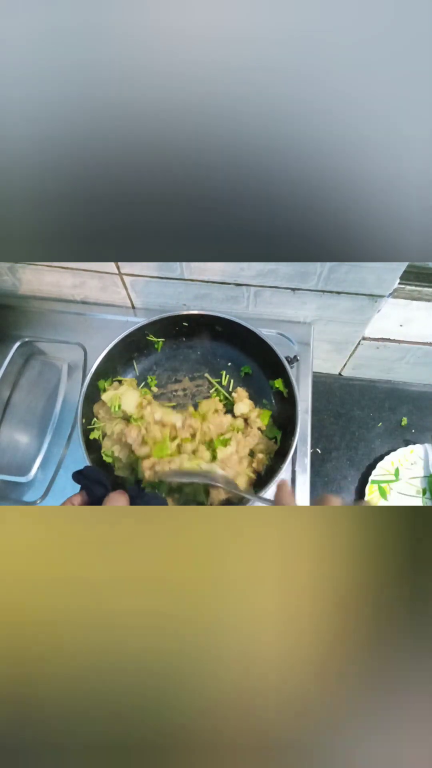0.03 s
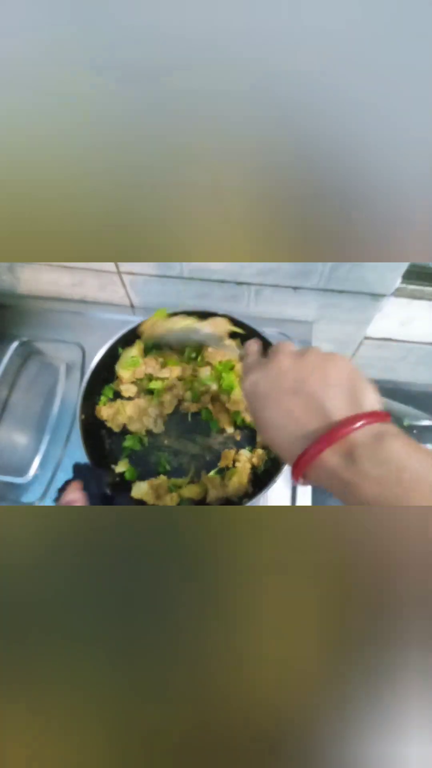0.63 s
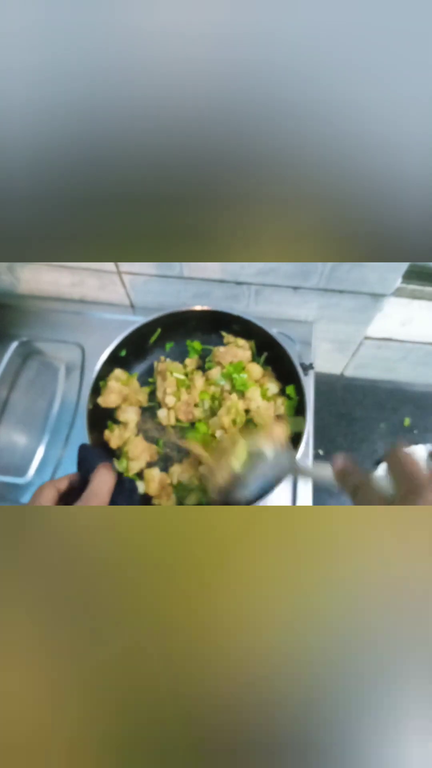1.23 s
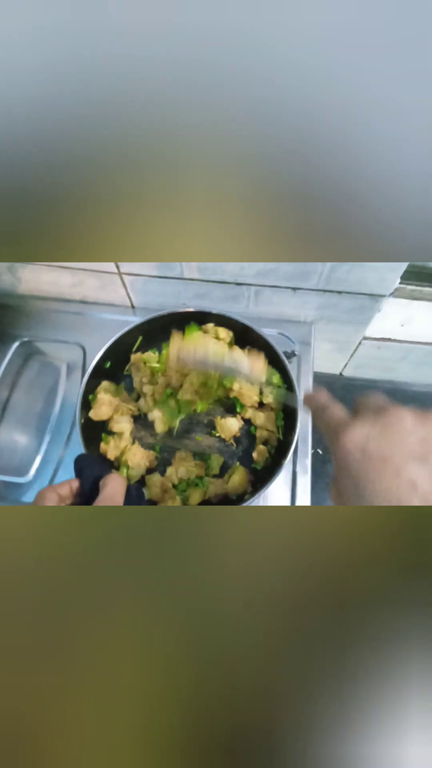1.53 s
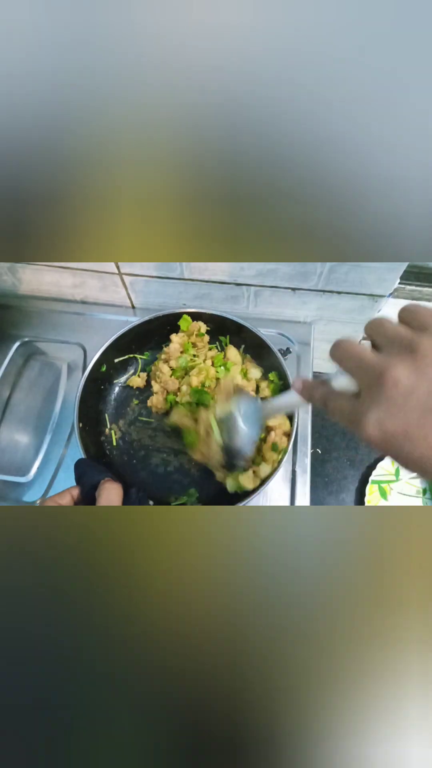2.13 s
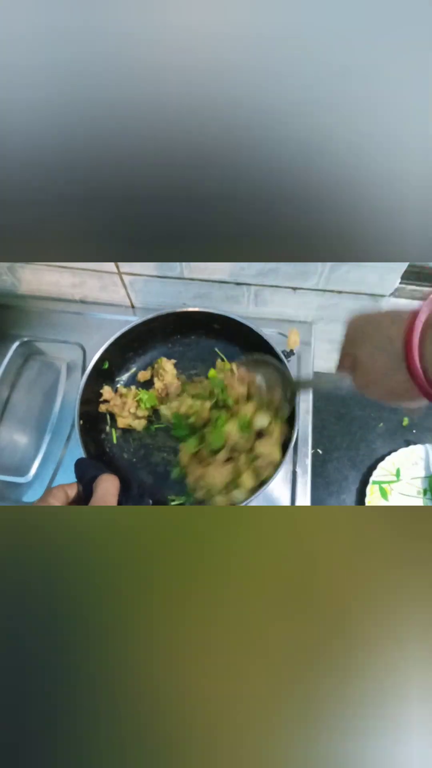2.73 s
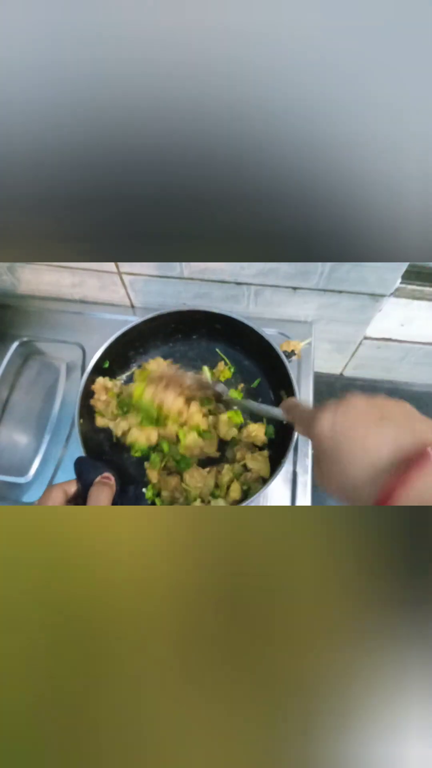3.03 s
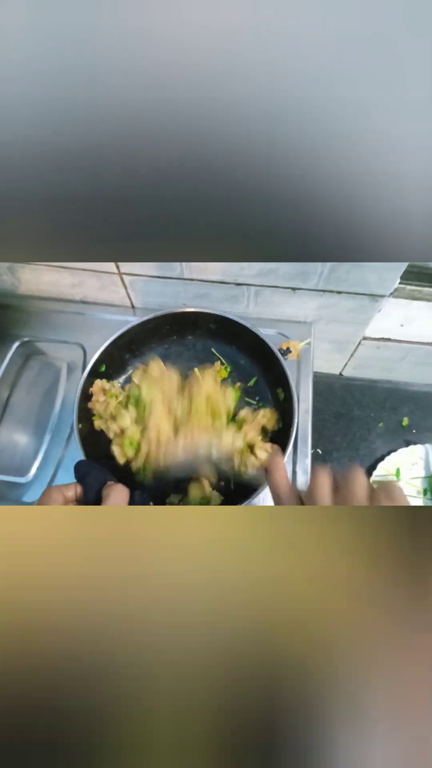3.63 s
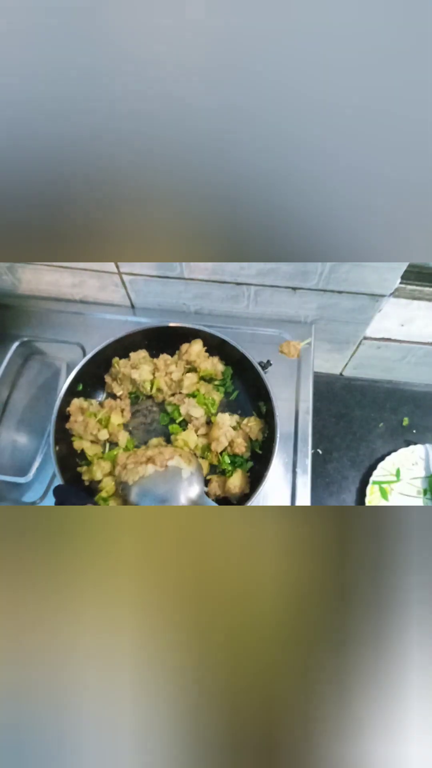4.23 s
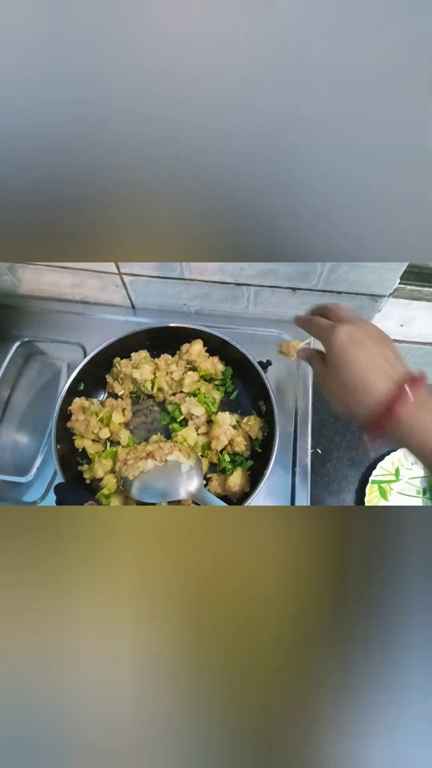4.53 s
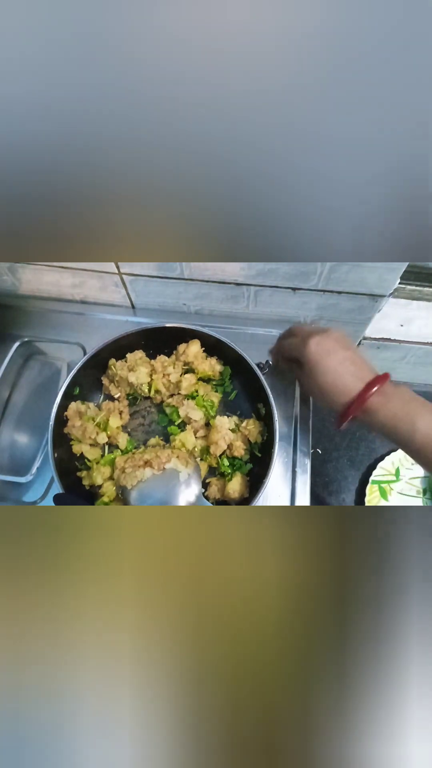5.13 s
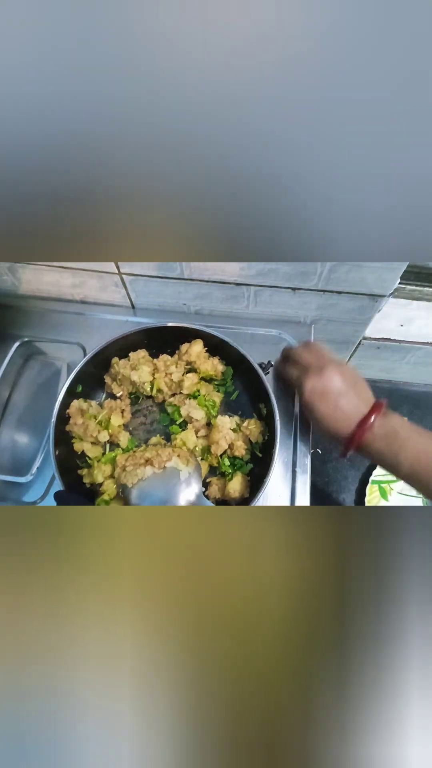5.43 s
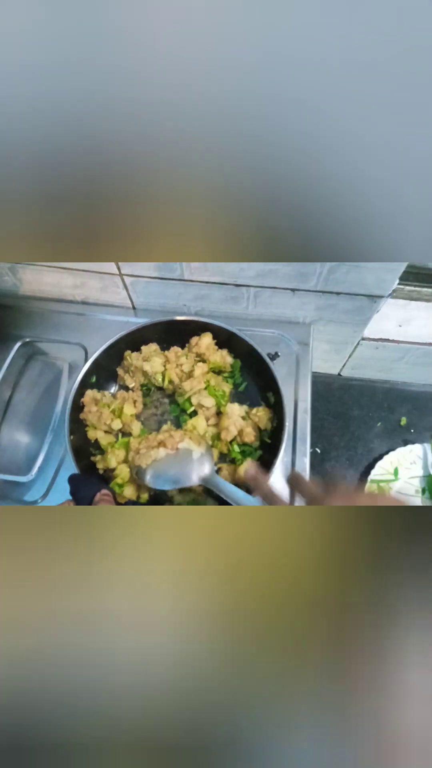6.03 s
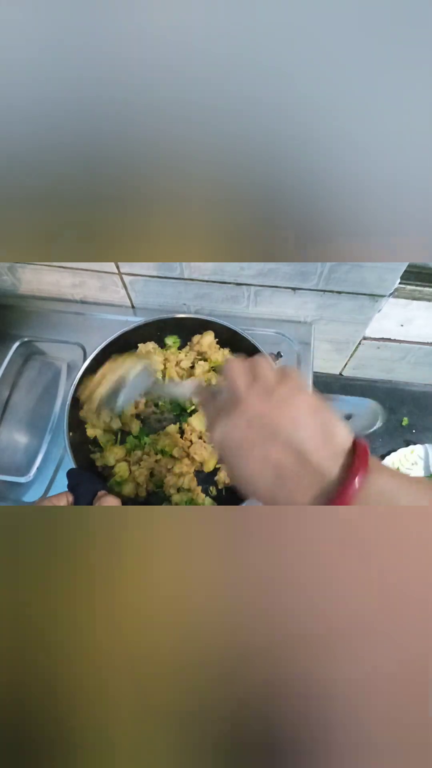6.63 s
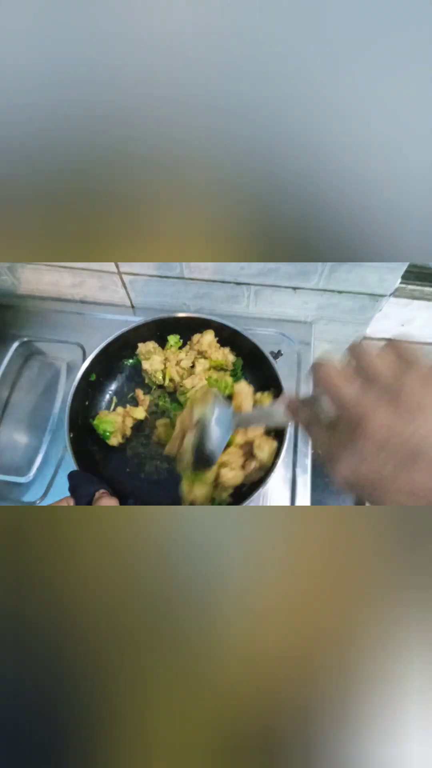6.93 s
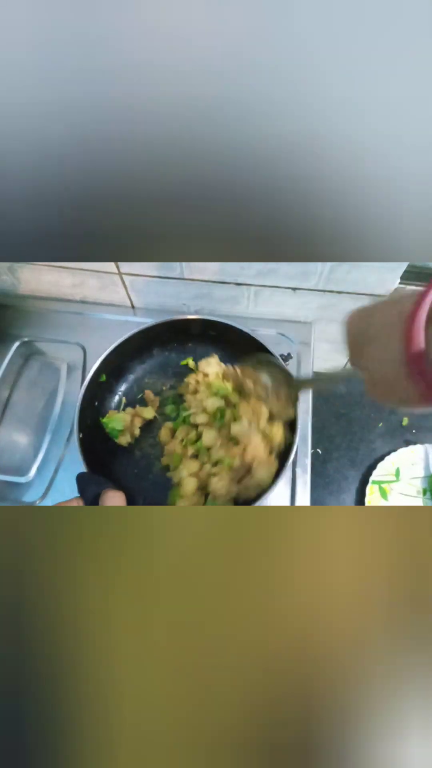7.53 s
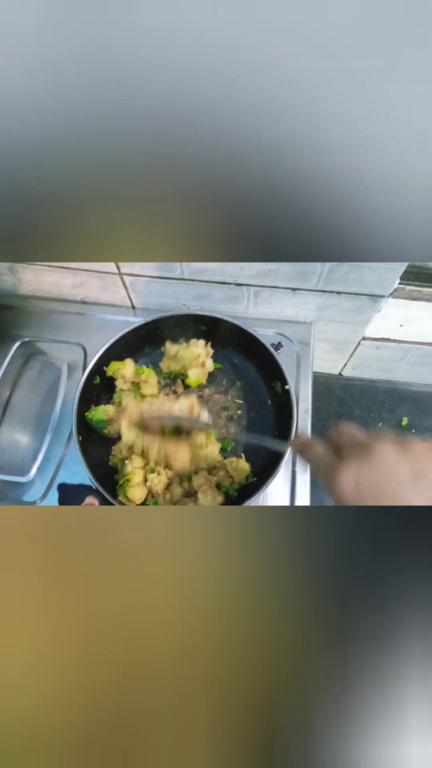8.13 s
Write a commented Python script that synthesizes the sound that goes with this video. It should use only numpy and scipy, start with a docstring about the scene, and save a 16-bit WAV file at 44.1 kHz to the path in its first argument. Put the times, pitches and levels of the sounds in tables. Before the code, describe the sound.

Thick, moist food shuffles around a frying pan as a metal spoon knocks and rasps against it in a small kitchen.

```python
"""Stirring in a frying pan

A metal spoon stirs a thick filling in a non-stick pan on a steel stove top, in a small tiled kitchen.
Blows ring the pan's modes; tiny slips drag through the food and rasp on the coating; stick-slip of
the edge squeals. Midway the spoon is laid down and the pan clatters on its support; stirring resumes."""
import sys
import numpy as np
from scipy import signal
from scipy.fft import rfft, irfft
from scipy.io import wavfile

SR = 44100
rng = np.random.default_rng(int(sys.argv[2]) if len(sys.argv) > 2 else 0)


def digitize_waveform(pressure):
    """Quantize a signal to 16-bit integers and store it at the path in sys.argv[1].

    Rows of a 2-D input are taken as channels; values are limited to [-1, 1].
    """
    field = np.atleast_2d(pressure).T
    bounded = np.clip(field, -1, 1)
    quanta = np.round(bounded * 32767).astype(np.int16)
    wavfile.write(sys.argv[1], SR, quanta)


N = 366030

# room rumble and hiss: f/Hz, density/dB
BACKGROUND_SPECTRUM = [(25, -42.5), (60, -14.5), (114, -3.5), (161, -21.5), (250, -7), (335, -17.5),
                       (530, -16), (1230, -26), (2480, -27), (4000, -27.5), (5600, -20), (7100, -16),
                       (9000, -32), (13500, -40.5), (15200, -30)]
# kitchen decay: f/Hz, T60/s
KITCHEN_T60 = [(150, 0.57), (400, 0.29), (1000, 0.3736), (2800, 0.56), (7000, 0.0856), (14000, 0.15)]
# reverberation re direct sound: f/Hz, level/dB
KITCHEN_WET = [(200, -1.5), (900, -1.5), (3000, -4.5), (7000, 1), (14000, 3)]
# pan shifting on the stove top: t/s, length/s, level/dB
PAN_SHIFTS = [(3.05, 0.78, -71), (7.1, 0.71, -70.5)]
# clear pan modes: f/Hz, energy/dB, T60/s
PAN_MODES = [(261, -3.5, 0.27), (384, -7, 0.23), (462, -8, 0.14), (587, -10, 0.43), (636.3, -5.5, 0.6),
             (707, -16, 0.22), (836, -2, 0.27), (902.3, -2, 0.16), (934, -1.5, 0.42), (1113, -9.5, 0.39),
             (1954, -12, 0.12), (2880, -13, 0.092), (4780, -9.5, 0.14), (6380, -10, .2), (7000, -7.5, 0.19),
             (6680, -13, 0.27), (7100, -17, 0.4)]
# dense, food-damped pan modes: f/Hz, density/dB
PAN_SPECTRUM = [(110, -10.5), (170, -11.5), (245, 10.5), (330, -8), (450, -3.5), (740, -2), (890, 7.5),
                (1100, -5), (1500, 0.5), (2200, -3.5), (2800, -4), (3800, -9.5), (4900, -7), (7000, 0.5),
                (8400, -13.5), (13000, -35), (15200, -22.5)]
# broad resonances of the held spoon: f/Hz, density/dB
SPOON_SPECTRUM = [(1000, -42), (2600, -11), (3500, -18), (4100, -6.5), (4950, -4), (5300, -5), (5650, -8.5),
                  (6500, -8.5), (7600, -5.5), (8500, -27), (15000, -35)]
# touches that ring only the spoon: t/s, relative level/dB
SPOON_CLINKS = [(0.3, -60.5), (1.3093, -43), (3.627, -50.5), (7.990, -50.5)]
# stick-slip of the edge: t/s, length/s, level/dB, slip rate/Hz
EDGE_SQUEALS = [(2.201, 0.0081, -49, 2560), (2.244, 0.014, -35.5, 2904), (2.254, 0.0177, -36.5, 2983),
                (2.326, 0.023, -37.5, 943), (2.369, 0.0145, -43.5, 948), (3.279, 0.0205, -35.5, 920),
                (3.295, 0.025, -41.5, 1255), (4.753, 0.014, -47.5, 576), (6.42, 0.0308, -39, 865),
                (6.898, 0.048, -46, 2080), (7.036, 0.04, -41, 2830), (7.064, 0.015, -37.5, 901),
                (7.109, 0.01, -37, 940)]
# weights of the squeal partials: f/Hz, relative level/dB
SQUEAL_SPECTRUM = [(950, 48), (1800, -25), (3000, 1.5), (6000, 1.5), (9000, -12), (12000, -16),
                   (16000, -20)]
# drag, judder and grit bands: low/Hz, high/Hz
FRICTION_BANDS = [(150, 700), (700, 3500), (3500, 17000)]
# bare edge on the coating: t/s, rise/s, fall/s, relative level/dB, grit re judder/dB, resonance/Hz
EDGE_SCRAPES = [(1.465, .03, 0.055, -51.5, 6.5, 3340), (2.246, 0.017, 0.04, -40.5, 9.5, 6300),
                (2.30, 0.025, 0.097, -45, 0.5, 1460), (3.245, 0.037, 0.057, -35, -12, 1430),
                (3.702, 0.0069, 0.17, -45, -7.5, 2000), (6.42, 0.022, 0.027, -45.5, 0.5, 5600),
                (6.601, 0.0073, 0.066, -44, -11.5, 2050), (6.893, 0.032, 0.059, -45.5, 4.5, 890),
                (7.036, 0.015, 0.062, -39, 4.5, 5300)]
# spoon pushing the filling: t/s, rise/s, fall/s, relative level/dB, bareness of the coating/dB
FOOD_PUSHES = [(0.275, 0.019, 0.091, -58.5, -15), (0.48, 0.14, 0.31, -53, 3), (0.818, .05, 0.11, -61.5, 3),
               (0.94, 0.023, 0.099, -37.5, -0.5), (1.06, 0.077, 0.13, -51.5, 7),
               (1.445, .012, 0.082, -36.5, 4.5), (1.62, 0.053, 0.067, -63, 14.5),
               (2.22, .16, 0.17, -51, -1), (3.14, 0.031, 0.07, -47, 12), (3.25, 0.077, 0.083, -39, 3),
               (3.699, 0.083, 0.17, -40, 2), (4.67, 0.077, 0.064, -46.5, -16),
               (4.79, 0.062, 0.068, -59, -13), (5.03, 0.17, 0.018, -51, 4), (5.205, 0.015, .13, -36, 2.5),
               (6.10, 0.044, 0.16, -67, 9), (6.237, 0.03, 0.096, -43, 8.5), (6.36, 0.042, 0.068, -40.5, 2),
               (6.471, 0.11, 0.073, -60.5, 11.5), (6.889, 0.078, 0.21, -44, 8),
               (7.06, 0.068, 0.16, -40.5, 3.5), (7.40, 0.047, 0.13, -47.5, -1), (8.15, 0.083, 0.05, -49, 5)]
# thud, clang, clack and tick bands: low/Hz, high/Hz
BLOW_BANDS = [(130, 660), (660, 1150), (1150, 4000), (4000, 17000)]
# blows of spoon, pan and support: # t/s, force/dB, hardness/dB (<0 through food, >0 bare metal), relative
# clang/dB, swing pitch/Hz (mostly the pan base; the 260 Hz row is the spoon juddering)
BLOWS = [(0.002, -47.5, -0.5, -2, 936), (0.272, -66, -1, 3, 933), (0.475, -49, 0, 5.5, 889),
         (0.932, -42, -4, 10, 740), (1.023, -48.5, -1.5, -0.5, 960), (1.108, -50, -2, 5, 876),
         (1.383, -58, -0.5, 6.5, 866), (1.4427, -45, -4, 4.5, 872), (1.863, -57, 0.5, -3, 922),
         (2.031, -50.5, -0.5, 7, 882), (2.0925, -30.5, 3, 9.5, 843), (2.2119, -47, 4, 5, 2660),
         (2.417, -51, 1, -12, 990), (2.5135, -56.5, -1.5, 5.5, 1046), (3.1369, -41.5, 0, 2, 1595),
         (3.16, -47.5, -5, 12.5, 260), (3.234, -41.5, -4, 8, 921), (3.311, -40.5, 3, -2.5, 727),
         (3.4317, -49.5, 1, 5, 838), (3.6753, -56.5, -2.5, 4, 843), (3.7021, -48, -1.5, -1, 666),
         (4.1592, -55, -3.5, -4, 1038), (4.2504, -67.5, -4.5, 7, 797), (4.659, -58.5, -8, 4, 884),
         (4.7298, -62.5, 3, -14, 880), (5.1992, -36.5, -0.5, -4, 1053), (5.2466, -53.5, 11.5, 9, 660),
         (5.7504, -70, -4, 3, 876), (6.2365, -52, -7.5, 3, 900), (6.342, -50.5, -1, 1.5, 923),
         (6.6, -48.5, -5.5, -1.5, 904), (6.894, -50, 5.5, -9, 840), (6.982, -48, 3, 6, 873),
         (7.2558, -54.5, -3, -6, 980), (7.536, -53, -4, 3.5, 901), (8.141, -58.5, -3.5, 2, 737),
         (8.2013, -57.5, -5, 11, 927)]


def gain_of(db):
    """dB to amplitude."""
    return 10 ** (np.asarray(db) / 20)


def unit_rms(x):
    """Scale to rms 1."""
    return x / np.sqrt(np.mean(x ** 2) + 1e-20)


def curve_at(points, hz):
    """Interpolate over log frequency."""
    f, value = np.transpose(points)
    return np.interp(np.log(hz + 1), np.log(f), value)


def add(mix, start_s, sound):
    """Mix a sound in at start_s."""
    part = mix[max(0, round(start_s * SR)):][:len(sound)]
    part += sound[:len(part)]


def bandpass(x, edges_hz, order=3):
    """Causal Butterworth band-pass."""
    return signal.sosfilt(signal.butter(order, edges_hz, "band", fs=SR, output="sos"), x)


def noise(spectrum, size):
    """Shaped noise, rms 1."""
    shape = gain_of(curve_at(spectrum, np.fft.rfftfreq(size, 1 / SR)))
    return unit_rms(irfft(rfft(rng.standard_normal(size)) * shape, size))


def wander(cutoff_hz, size):
    """Smooth random signal, rms 1."""
    rolloff = 1 + (np.fft.rfftfreq(size, 1 / SR) / cutoff_hz) ** 4
    return unit_rms(irfft(rfft(rng.standard_normal(size)) / rolloff, size))


def background(level_db=-70.5, waver_db=2.7, waver_hz=6):
    """Low room rumble and faint hiss, wavering slightly."""
    return gain_of(level_db - waver_db * wander(waver_hz, N)) * noise(BACKGROUND_SPECTRUM, N)


def kitchen(x, first_echo_s=0.0066, build_up_s=0.0021):
    """Close tiled walls add dense, early echoes; each band decays at its own rate."""
    t = np.arange(SR) / SR
    echoes = rng.choice([-1., 1.], SR) * (rng.random(SR) < .1)
    echoes = unit_rms(echoes) * (1 - np.exp(-np.maximum(t - first_echo_s, 0) / build_up_s))
    hz, frame_s, spectra = signal.stft(echoes, SR, nperseg=256)
    decay_per_s = np.log(1000) / curve_at(KITCHEN_T60, hz)[:, None]
    decay = np.exp(-decay_per_s * frame_s) * np.sqrt(2 * decay_per_s / SR)  # unit energy
    wet = gain_of(curve_at(KITCHEN_WET, hz))[:, None]
    tail = signal.istft(spectra * decay * wet, SR, nperseg=256)[1]
    return x + signal.fftconvolve(x, tail)[:N]


def stove(thump_db=-35, thump_s=0.046, band_hz=(50, 110), size=32768):
    """The stove top rumbles as the pan shifts and thumps faintly under each blow."""
    envelope, t = np.zeros(N), np.arange(size) / SR
    for start_s, length_s, db in PAN_SHIFTS:
        add(envelope, start_s, gain_of(db) * np.sin(np.linspace(0, np.pi, round(length_s * SR))))
    for start_s, force_db, *_ in BLOWS:
        add(envelope, start_s, gain_of(force_db + thump_db) * np.exp(-t / thump_s))
    return envelope * unit_rms(bandpass(rng.standard_normal(N), band_hz, order=2))


def clinks(trim_db=1, damping_s=0.0053, ping_hz=5280, ping_db=-5, ping_decay_s=0.0076, size=8192):
    """The spoon pings; the hand damps it almost at once."""
    out, t = np.zeros(N), np.arange(size) / SR
    ping = gain_of(ping_db) * np.sin(2 * np.pi * ping_hz * t) * np.exp(-t / ping_decay_s)
    for start_s, db in SPOON_CLINKS:
        burst = noise(SPOON_SPECTRUM, size) * np.exp(-t / damping_s)
        add(out, start_s, gain_of(db + trim_db) * (burst + ping))
    return out


def squeals(sag=0.034, jitter=0.057, jitter_hz=600, flutter_db=3, flutter_hz=160, size=8192):
    """Near-periodic stick-slip of the spoon's edge: five hoarse partials, sagging in pitch."""
    out = np.zeros(N)
    for start_s, length_s, db, slip_hz in EDGE_SQUEALS:
        n = round(length_s * SR)
        hz = slip_hz * (1 + sag * np.linspace(.5, -.5, n) + jitter * wander(jitter_hz, size)[:n])
        phase = 2 * np.pi * np.cumsum(hz) / SR
        tone = sum(gain_of(curve_at(SQUEAL_SPECTRUM, k * slip_hz)) * np.sin(k * phase)
                   for k in range(1, 6))
        grip = gain_of(flutter_db * wander(flutter_hz, size)[:n]) * signal.windows.tukey(n, .3)
        add(out, start_s, gain_of(db) * unit_rms(tone * grip))
    return out


def pan(contact_s, ring_db, attack_s=0.00074, size=32768):
    """Response to one touch: a burst of dense modes, plus clear ones weighted at random by place."""
    t = np.arange(size) / SR
    burst = noise(PAN_SPECTRUM, size) * np.exp(-t / contact_s)
    ring = np.zeros(size)
    for (hz, db, t60_s), (place, phase_turns) in zip(PAN_MODES, rng.random((len(PAN_MODES), 2))):
        mode = np.sin(2 * np.pi * (hz * t + phase_turns)) * gain_of(-60 * t / t60_s)
        ring += gain_of(db) * (.5 + .5 * place) * unit_rms(mode)
    food_cushion = 1 - np.exp(-(t / attack_s) ** 2)
    return (unit_rms(burst) + gain_of(ring_db) * ring) * food_cushion


def stroke(rise_s, fall_s, bands_db, ring_db, slips_per_s, slip_db, clump_db, clump_hz, contact_s,
           catches_per_s=45, arch_db=20, size=32768):
    """Clumps of tiny, uneven slips excite the pan under one arch of hand pressure."""
    t = np.arange(0, rise_s + fall_s, 1 / SR)
    slips = (rng.random(size) < slips_per_s / SR) * rng.choice([-1, 1], size)
    spread_db = slip_db * np.minimum(rng.exponential(1, size), 3)
    slips = slips * gain_of(spread_db + clump_db * wander(clump_hz, size))
    # the edge catches on four places in turn, each with its own colour
    place = np.cumsum(rng.random(size) < catches_per_s / SR) % 4
    rub = sum(irfft(rfft(slips * (place == k)) * rfft(pan(contact_s, ring_db), size)) for k in range(4))
    slack = np.interp(t, [0, rise_s, rise_s + fall_s], [1, 0, 1]) ** 1.25
    pressure = gain_of(-arch_db * slack) * signal.windows.tukey(len(t), .1)
    return pressure * sum(gain_of(db) * unit_rms(bandpass(rub[:len(t)], edges_hz))
                          for edges_hz, db in zip(FRICTION_BANDS, bands_db))


def scrapes(trim_db=-2, drag_db=-12.5, resonance_q=4.5):
    """Metal on coating, moving little food: a rasp of sharp slips that favours one resonance."""
    out = np.zeros(N)
    for start_s, rise_s, fall_s, db, grit_db, hz in EDGE_SCRAPES:
        bands_db = trim_db + db + np.array([drag_db, 0, grit_db])
        rasp = stroke(rise_s, fall_s, bands_db, ring_db=-18.5, slips_per_s=1800, slip_db=3.5,
                      clump_db=2, clump_hz=89.5, contact_s=0.002)
        resonance = signal.lfilter(*signal.iirpeak(hz, resonance_q, fs=SR), rasp)
        add(out, start_s, rasp + resonance)
    return out


def pushes(trim_db=-2, judder_db=-8.5, grit_db=-14.5):
    """Moist food shuffles ahead of the spoon, grittier where it lies thin."""
    out = np.zeros(N)
    for start_s, rise_s, fall_s, db, bare_db in FOOD_PUSHES:
        bands_db = trim_db + db + np.array([0, judder_db + 0.28 * bare_db, grit_db + bare_db])
        shuffle = stroke(rise_s, fall_s, bands_db, ring_db=-10.5, slips_per_s=2000, slip_db=4.5,
                         clump_db=2.5, clump_hz=70.6, contact_s=0.003)
        add(out, start_s, shuffle)
    return out


def knocks(trim_db=-2.5, ring_db=-12, flex_db=-3, flex_rise_s=.003):
    """Each blow rings the pan and sets off a brief swing, mostly of its base; blows through food thud, bare
    metal ticks."""
    out, onset = np.zeros(N), slice(SR // 40)
    for start_s, force_db, hard_db, clang_db, hz in BLOWS:
        contact_s = 0.01 * 2 ** ((force_db + 50) / 40.5)  # heavier blows press longer
        attack_s = .0007 * 2 ** (-hard_db / 5.5)  # thicker food slows the attack
        response = pan(contact_s, ring_db, attack_s)
        bands_db = (-hard_db, clang_db - 5, 0.11 * hard_db - 0.5, hard_db)  # thud, clang, clack, tick
        for edges_hz, db in zip(BLOW_BANDS, bands_db):
            part = bandpass(response, edges_hz, order=4)
            add(out, start_s, gain_of(force_db + db + trim_db) * part / np.std(part[onset]))
        # the base, or the juddering spoon, swings briefly until the food stops it
        t = np.arange(len(response)) / SR
        flex = np.sin(2 * np.pi * hz * t) * (1 - np.exp(-t / flex_rise_s)) * np.exp(-t / contact_s)
        add(out, start_s, gain_of(force_db + clang_db + flex_db) * flex / np.std(flex[onset]))
    return out


def scene():
    """Spoon and pan in the kitchen, over stove and background; mono."""
    stirring = knocks() + clinks() + pushes() + scrapes() + squeals()
    return (kitchen(stirring) + stove() + background())[None]


def record(dry):
    """Low-pass at 15.8 kHz."""
    lowpass = signal.firwin(511, 15800, window=("kaiser", 9), fs=SR)
    return signal.oaconvolve(dry, lowpass[None], "same")


dry = scene()
out = record(dry)
digitize_waveform(out)
```